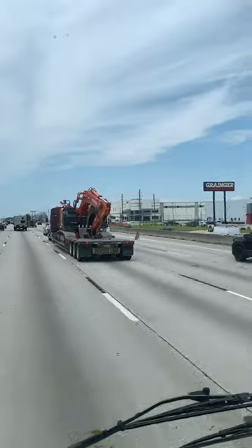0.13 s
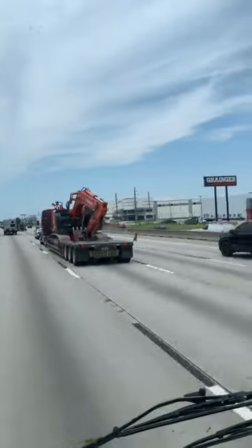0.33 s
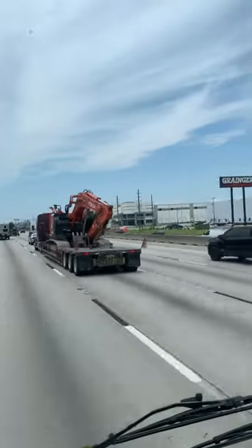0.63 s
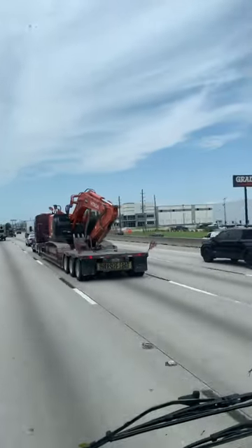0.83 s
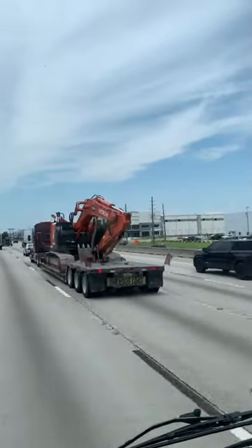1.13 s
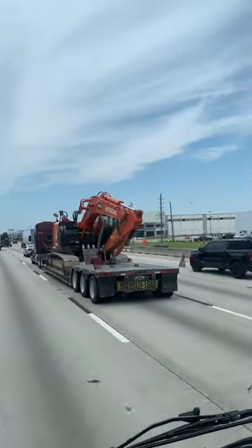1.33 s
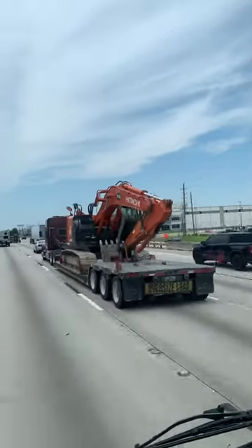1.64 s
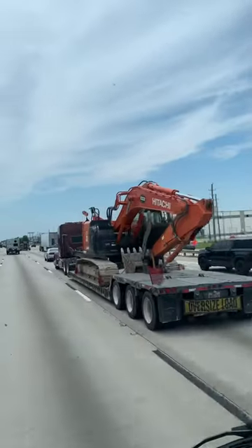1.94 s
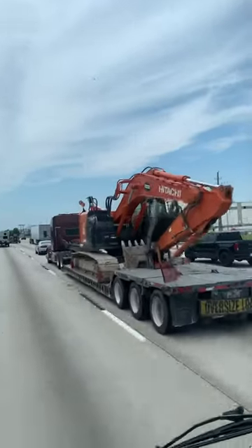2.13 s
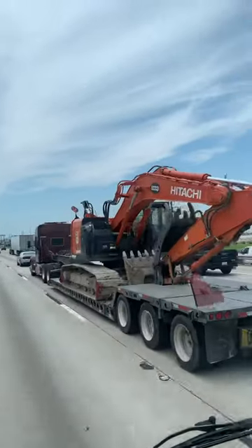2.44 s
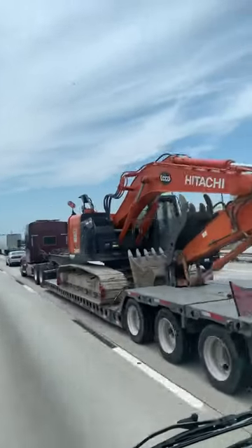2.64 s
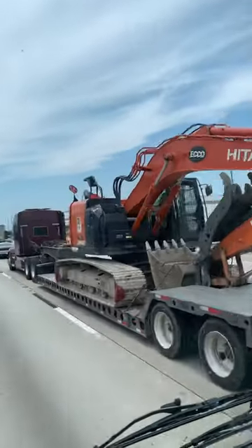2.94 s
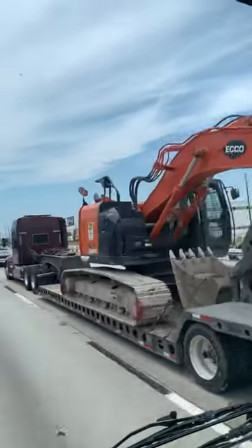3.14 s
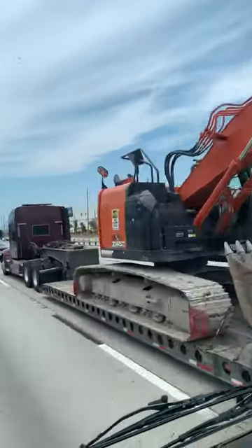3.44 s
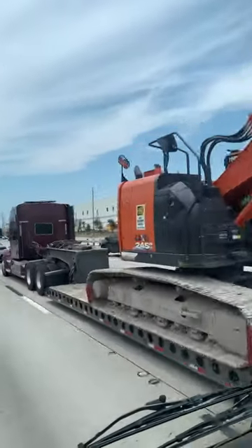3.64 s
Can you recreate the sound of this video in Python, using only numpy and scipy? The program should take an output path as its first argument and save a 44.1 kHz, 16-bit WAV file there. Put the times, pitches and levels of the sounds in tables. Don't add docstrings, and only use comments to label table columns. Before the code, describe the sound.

Low, heavy road rumble inside a moving truck cab, with tyre roar and a swelling engine drone

```python
import sys
import numpy as np
from scipy import signal
from scipy.fft import rfft, irfft
from scipy.io import wavfile
from scipy.ndimage import uniform_filter1d

SR = 44100
rng = np.random.default_rng(int(sys.argv[2]) if len(sys.argv) > 2 else 0)


def amplitude_ratio(level_db):
    exponent = np.asarray(level_db, float) / 20
    return 10 ** exponent


def file_out(sig):
    cols = np.atleast_2d(sig).T
    lim = np.clip(cols, -1, 1)
    pcm = np.round(lim * 32767).astype(np.int16)
    wavfile.write(sys.argv[1], SR, pcm)


N = 166257
T = np.arange(N) / SR
HZ = np.arange(N // 2 + 1) * SR / N

# (time [s], rumble [dB], roar [dB], wind [dB])
ROAD = [(0.06, -19.5, -28.5, -47), (0.25, -21, -30.5, -46.5), (0.72, -21, -28.5, -45),
        (0.74, -21.5, -27.5, -46.5), (0.88, -20.5, -32, -48), (1.04, -19, -30, -50),
        (1.06, -22.5, -29.5, -48), (1.32, -21, -28.5, -47), (1.39, -18.5, -30, -47.5),
        (1.44, -22, -28, -45), (2.22, -20.5, -28, -44.5), (2.29, -20, -27.5, -44.5),
        (2.32, -23.5, -27.5, -44.5), (2.5, -21, -29, -44.5), (2.76, -21.5, -30, -45.5),
        (2.89, -22.5, -28.5, -45.5), (3.66, -20, -29.5, -44.5), (3.76, -27, -26.5, -44)]
# (frequency [Hz], density [dB per Hz])
RUMBLE_COLOUR = [(12, -41), (20, 5.5), (59, 2.5), (92, 1), (151, 2), (232, -4.5), (325, -12), (375, -8.5),
                 (450, -50), (580, -45), (990, -120)]
# (frequency [Hz], density [dB per Hz])
ROAR_COLOUR = [(200, -39), (420, 0.5), (650, -4), (1000, -2.5), (1500, -3.5), (2150, -8), (2450, -19),
               (4000, -44)]
# (frequency [Hz], density [dB per Hz])
HISS_COLOUR = [(1200, -14.5), (2500, -2), (4000, -2), (7500, -11.5), (8300, -12), (12200, -15.5),
               (12700, -26), (16000, -23)]
# (frequency [Hz], width [Hz], level against the rumble [dB])
PANELS = [(56, 36, -5), (85.7, 12, -6.5), (146.2, 13.2, -5), (187, 13.6, -11), (241.3, 8.9, -19),
          (285.6, 18, -13.5), (365, 12.3, -12.5)]
# (time [s], level [dB])
ENGINE_LEVEL = [(0.06, -40), (0.9, -36), (1.3, -36), (1.45, -26), (1.55, -17), (1.64, -17), (1.88, -18.5),
                (1.95, -14.5), (2.2, -14), (2.55, -16), (2.65, -15), (2.75, -18), (2.94, -15), (3.05, -18),
                (3.3, -16), (3.5, -16), (3.65, -14), (3.76, -14)]
# (time [s], level [dB])
GEAR_LEVEL = [(0.06, -25.5), (0.11, -25), (0.2, -39), (0.3, -25.5), (0.58, -29), (1.19, -31), (1.37, -26),
              (1.54, -31), (1.8, -32), (1.88, -25), (2.16, -27.5), (2.3, -26), (2.46, -31), (2.56, -27.5),
              (2.82, -28.5), (2.87, -36), (2.93, -30), (3.28, -30), (3.36, -44)]
# (time [s], level [dB])
TREAD_LEVEL = [(.05, -35.5), (.4, -36), (.49, -39), (.515, -22.5), (.59, -26), (.63, -23), (.67, -29),
               (.72, -27), (.75, -32), (.78, -28.5), (.86, -30), (.945, -28.5), (.97, -44), (1.75, -44),
               (1.9, -35), (2.35, -36), (2.5, -42), (3.2, -39), (3.4, -46.5)]
# (time [s], level [dB], floor ring [Hz])
BUMPS = [(0.072, -16, 80), (0.124, -13.5, 70), (0.196, -13, 85), (0.253, -12, 121.4), (0.32, -10, 134),
         (0.335, -12, 48), (0.371, -21, 73.6), (0.425, -21, 290), (0.449, -12.5, 75), (0.455, -27, 152),
         (0.471, -16.5, 244), (0.482, -9, 83), (0.498, -16, 134.5), (0.537, -16, 57), (0.54, -14, 118),
         (0.543, -21, 297), (0.577, -19, 51), (0.645, -16.5, 56.7), (0.693, -13.5, 90), (0.767, -17.5, 298),
         (0.775, -16.5, 172), (0.791, -9, 66.5), (0.868, -19, 183), (0.873, -7.5, 90), (0.908, -22, 161),
         (0.962, -16, 100), (1.053, -20.5, 293), (1.063, -9.5, 115), (1.143, -14, 83), (1.189, -13.5, 127),
         (1.189, -19, 74), (1.237, -18, 115), (1.262, -13, 57.4), (1.388, -12, 75), (1.439, -15, 114),
         (1.447, -15.5, 231.6), (1.479, -13.5, 119), (1.497, -25.5, 225), (1.668, -18, 234),
         (1.702, -16, 184), (1.722, -17, 65), (1.783, -16.5, 75), (1.892, -11, 64.6), (1.91, -9.5, 146),
         (2.043, -13, 73), (2.125, -12, 57), (2.212, -12, 75), (2.275, -14, 180), (2.332, -13, 75),
         (2.407, -13, 59), (2.445, -17, 180), (2.514, -18, 57), (2.7, -20, 51), (2.712, -9, 136),
         (2.75, -17, 191), (2.916, -17, 67.5), (3.047, -13, 67), (3.092, -16, 73.6), (3.191, -15, 54),
         (3.676, -21, 62)]
# (time [s], level [dB], decay [s])
TICKS = [(1.021, -50, .01), (1.365, -42, .015), (1.455, -48, .012), (1.81, -47, .02), (1.885, -42, .03),
         (2.146, -48, .012), (2.44, -33, .006), (2.447, -38, .006), (2.454, -37, .012), (2.546, -41, .008),
         (2.556, -41, .008), (2.564, -42, .006), (3.14, -50, .015), (3.404, -49, .01), (3.51, -46, .015)]
# (time [s], level [dB])
TRAILER_LEVEL = [(1.97, -50), (2.03, -28), (2.1, -42), (2.3, -35), (2.4, -36), (2.52, -44), (2.64, -34),
                 (2.7, -40), (2.77, -28), (2.87, -29), (2.92, -39), (2.98, -32), (3.2, -35), (3.4, -40),
                 (3.49, -30), (3.58, -33), (3.67, -42), (3.72, -29)]
# (time [s], level [dB])
BOOM_LEVEL = [(3.25, -50), (3.38, -35), (3.52, -35), (3.6, -45), (3.75, -35)]
# (frequency [Hz], lead [rad])
PORT_LEAD = [(0, 0), (500, .3), (2500, 2.55), (3550, 1.75), (4700, 3.14), (15300, 18.85), (22050, 28.8)]
# (frequency [Hz], share [dB])
PORT_DIFFUSE = [(30, -28), (120, -39.5), (250, -10.5), (520, -6), (1000, 7), (1600, -19.5), (2500, -4.5),
                (6000, -5.5)]


def column(table, k):
    table = np.array(table)
    return np.interp(T, table[:, 0], table[:, k])


def on_log(table, hz):
    table = np.array(table)
    return np.interp(np.log(np.maximum(hz, 1)), np.log(table[:, 0]), table[:, 1])


def unit(x):
    return x / np.sqrt(np.mean(x ** 2))


def walk(rate):
    hold = int(SR / rate)
    steps = np.repeat(rng.standard_normal(N // hold + 1), hold)
    return unit(uniform_filter1d(uniform_filter1d(steps, hold), hold)[:N])


def bands(colour, swell_db, flicker_db, rate):
    low, high = colour[0][0], colour[-1][0]
    swell = walk(rate)
    noise = rfft(rng.standard_normal((2, N))) * amplitude_ratio(on_log(colour, HZ)) * (HZ > low) * (HZ < high)
    out = 0
    for centre in low * 2 ** np.arange(0, np.log2(high / low) + .5, .5):
        octaves = np.log2(np.maximum(HZ, 1) / centre)
        bell = np.cos(np.pi * np.clip(octaves, -.5, .5)) ** 2
        out = out + irfft(noise * bell, N) * amplitude_ratio(swell_db * swell + flicker_db * walk(2 * rate))
    return unit(out)


def patchy(x, patchy_db, size):
    z = signal.stft(x, nperseg=size)[2]
    flicker = uniform_filter1d(rng.standard_normal(z.shape), size=2)
    z = z * amplitude_ratio(patchy_db * np.sqrt(2) * np.clip(flicker, -3, 1.2))
    return unit(signal.istft(z, nperseg=size)[1][:, :N])


def resonance(hz, width):
    b, a = signal.iirpeak(hz, hz / width, SR)
    return signal.lfilter(b, a, rng.standard_normal((2, N)))


def tone(start_hz, drift, level, wobble, beat_db, rate, second_db, rough):
    phase = 2 * np.pi * np.cumsum((start_hz + drift * T) * (1 + wobble * walk(rate))) / SR
    phase = phase + rough * walk(45)
    phase = phase + np.array([np.zeros(N), 2 * walk(14)])
    fade = np.clip((T - level[0][0]) / 0.12 + 1, 0, 1)
    loudness = fade * (1 + rough * walk(45)) * amplitude_ratio(column(level, 1) + beat_db * walk(rate))
    return np.sqrt(2) * loudness * (np.sin(phase) + amplitude_ratio(second_db) * np.sin(2 * phase))


def rumble():
    out = bands(RUMBLE_COLOUR, swell_db=-3.0, flicker_db=2.5, rate=4.7)
    for hz, width, db in PANELS:
        out = out + amplitude_ratio(db) * unit(resonance(hz, width))
    return patchy(out, patchy_db=2.0, size=4096) * amplitude_ratio(column(ROAD, 1) + 3.5)


def roar():
    noise = bands(ROAR_COLOUR, swell_db=-0.67, flicker_db=1.1, rate=6.)
    return patchy(noise, patchy_db=3.5, size=1024) * amplitude_ratio(column(ROAD, 2) + 4.5)


def wind():
    hiss = patchy(bands(HISS_COLOUR, swell_db=0.9, flicker_db=0.0, rate=7.85), patchy_db=5.5, size=1024)
    top = irfft(rfft(hiss) * (HZ > 12400), N)
    gust_db = 4 * walk(10)
    hiss = hiss + top * (amplitude_ratio(gust_db) - 1)
    return hiss * amplitude_ratio(column(ROAD, 3) + 7.5)


def engine():
    firing = tone(122, -.8, ENGINE_LEVEL, wobble=.01, beat_db=.8, rate=16., second_db=-18, rough=.3)
    half = tone(61, -.4, ENGINE_LEVEL, wobble=.04, beat_db=3., rate=8., second_db=-40, rough=.3)
    return firing + amplitude_ratio(-9.5) * half


def gear():
    return tone(528, -4.1, GEAR_LEVEL, wobble=.004, beat_db=1.6, rate=24., second_db=-25, rough=.33)


def tread():
    return tone(1424, -11, TREAD_LEVEL, wobble=.0015, beat_db=.7, rate=30., second_db=-40, rough=.17)


def bumps():
    rise = 0.013
    t = np.arange(int(12 * rise * SR)) / SR
    push = t / rise * np.exp(1 - t / rise)
    out = np.zeros(N + SR)
    for at, db, hz in BUMPS:
        start = int((at - rise) * SR)
        out[start:start + len(t)] += amplitude_ratio(db - 1) * push * np.sin(2 * np.pi * hz * (t - rise))
    return out[:N]


def trim():
    shape = 0
    for at, db, decay in TICKS:
        shape = shape + amplitude_ratio(db) * (T >= at) * np.exp(-np.maximum(T - at, 0) / decay)
    bright = signal.butter(2, [7800., 13000.], "bandpass", fs=SR, output="sos")
    return shape * unit(signal.sosfilt(bright, rng.standard_normal((2, N))))


def trailer():
    return tone(985, 5, TRAILER_LEVEL, wobble=.006, beat_db=1.5, rate=30., second_db=-30, rough=.6)


def alongside():
    start, full = 2.3, 3.3
    nearness = np.clip((T - start) / (full - start), 0, 1)
    return amplitude_ratio(-33) * nearness * patchy(resonance(hz=1070, width=240), patchy_db=5., size=1024)


def boom():
    return tone(597, 0, BOOM_LEVEL, wobble=.006, beat_db=1., rate=20., second_db=-30, rough=.35)


def ports(pair):
    lead = np.interp(HZ, *np.array(PORT_LEAD).T)
    alike = 1 - amplitude_ratio(2 * np.minimum(on_log(PORT_DIFFUSE, HZ), 0))
    share = (1 - alike * np.cos(lead)) / 2
    tied = np.clip(alike * np.sin(lead) / (2 * np.sqrt(share * (1 - share))), -1, 1)
    weak = .16
    snapped = np.clip((share - weak) / (1 - 2 * weak), 0, 1)
    share = np.where(HZ > 4000, snapped, share)
    one, other = rfft(pair)
    mid = np.sqrt(1 - share) * one
    side = np.sqrt(share) * (1j * tied * one + np.sqrt(1 - tied ** 2) * other)
    octaves = np.log2(np.maximum(HZ, 1) / 330)
    tilt = 2.3 / 2 * np.exp(-(octaves / 0.81) ** 2)
    return irfft(np.array([(mid + side) * amplitude_ratio(-tilt), (mid - side) * amplitude_ratio(tilt)]), N)


def scene():
    road = rumble() + roar() + wind() + bumps()
    lorry = engine() + gear() + tread() + trim()
    passing = trailer() + alongside() + boom()
    return ports(road + lorry + passing)


def low_pass(x):
    return signal.sosfilt(signal.butter(12, 16810, fs=SR, output="sos"), x)


def record(dry):
    rounded = np.tanh(0.85 * dry) / 0.77
    bass_cut = 1 / (1 + (25.7 / np.maximum(HZ, 1)) ** 4)
    wet = irfft(rfft(rounded) * (HZ < 15780) * bass_cut, N)
    opening = np.clip((T - .0345) / .002, 0, 1)
    closing = np.sin(np.pi / 2 * np.clip(T[::-1] / .003, 0, 1)) ** 2
    return low_pass(wet * opening * closing)


dry = scene()
out = record(dry)
file_out(out)
```